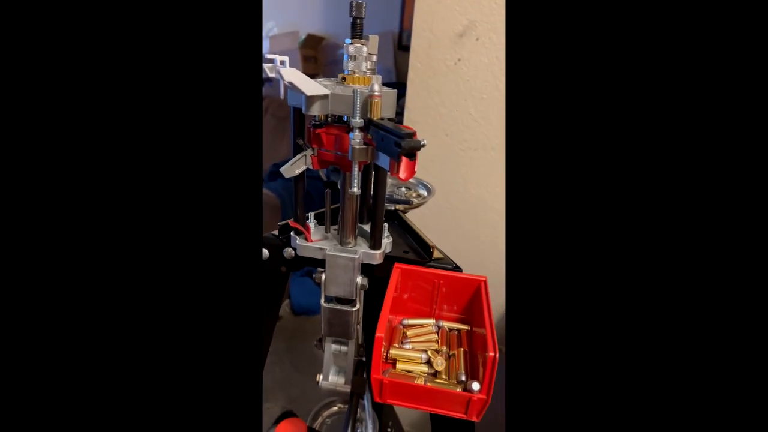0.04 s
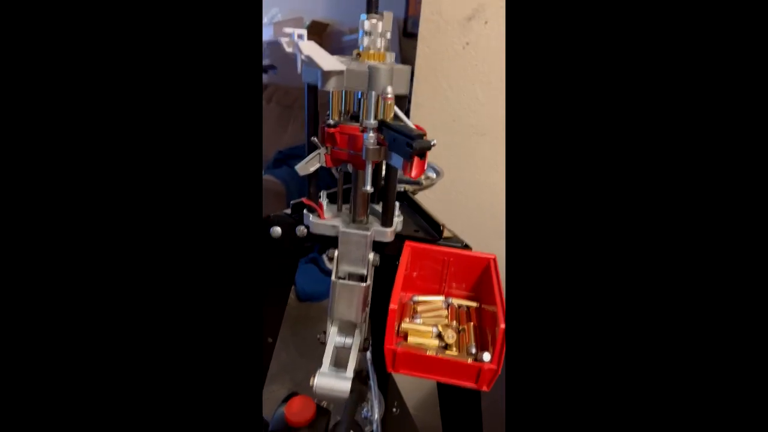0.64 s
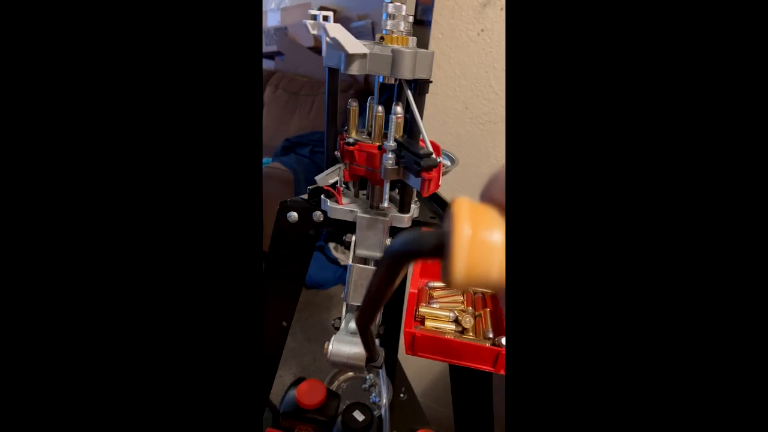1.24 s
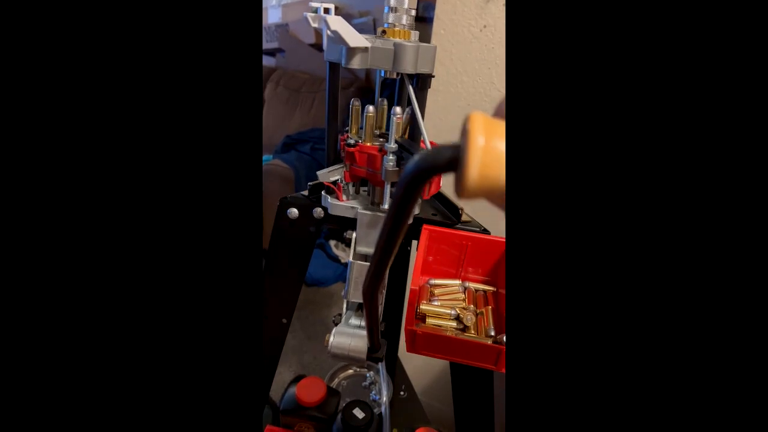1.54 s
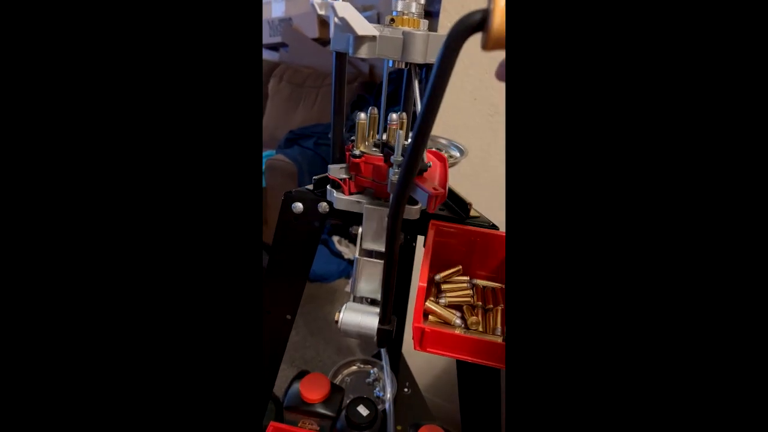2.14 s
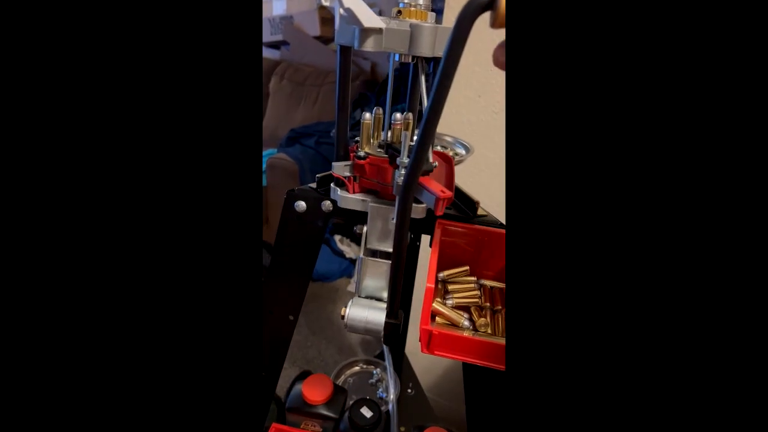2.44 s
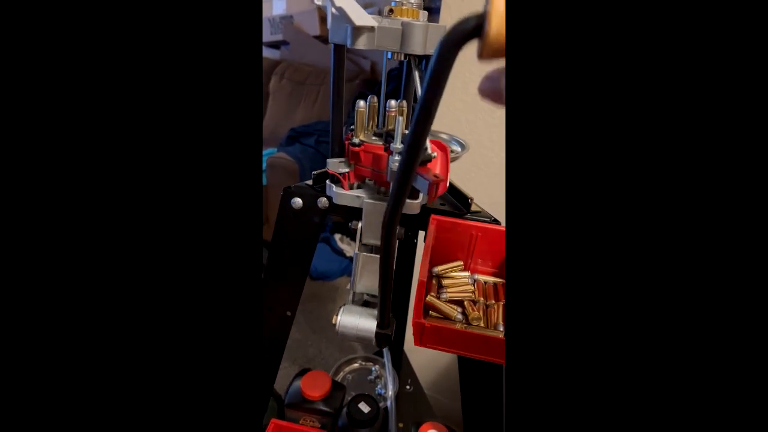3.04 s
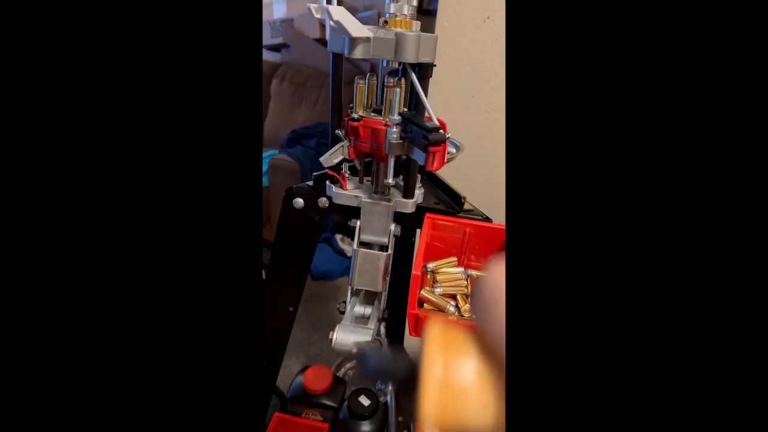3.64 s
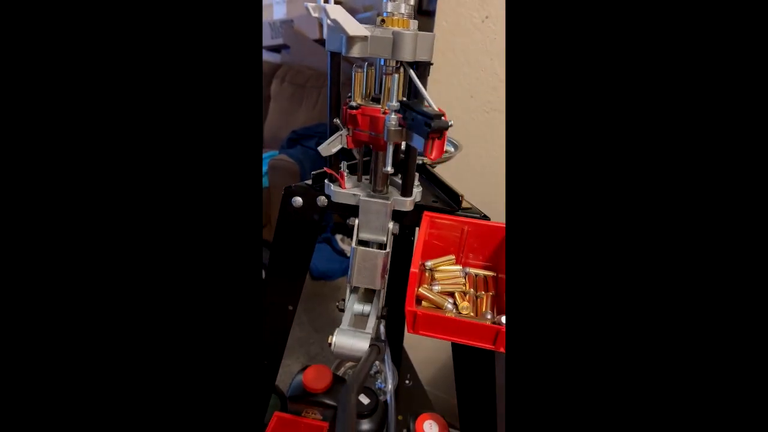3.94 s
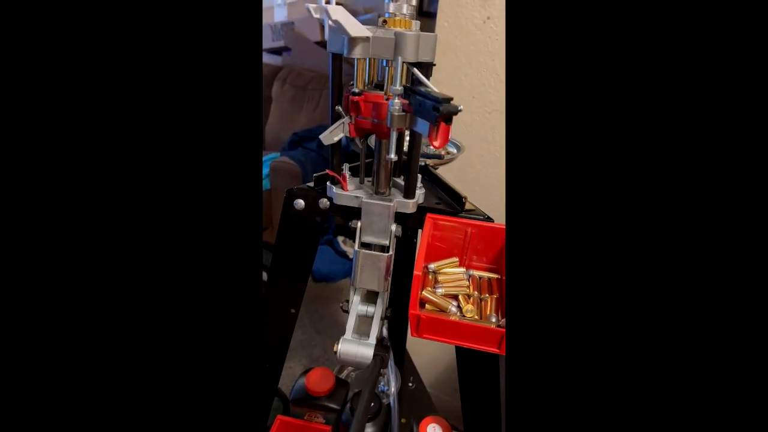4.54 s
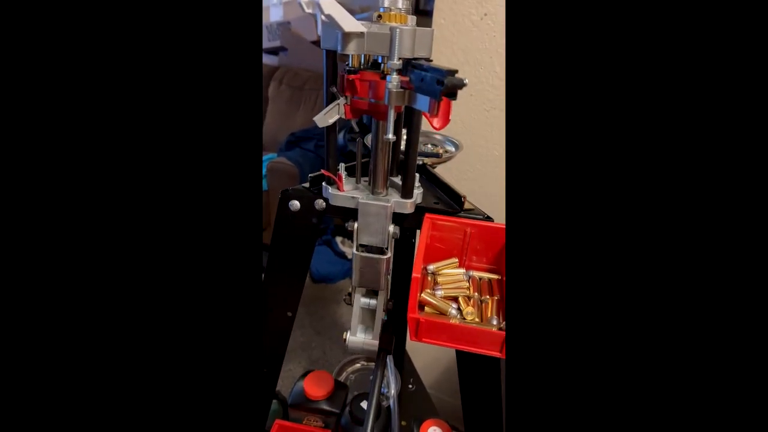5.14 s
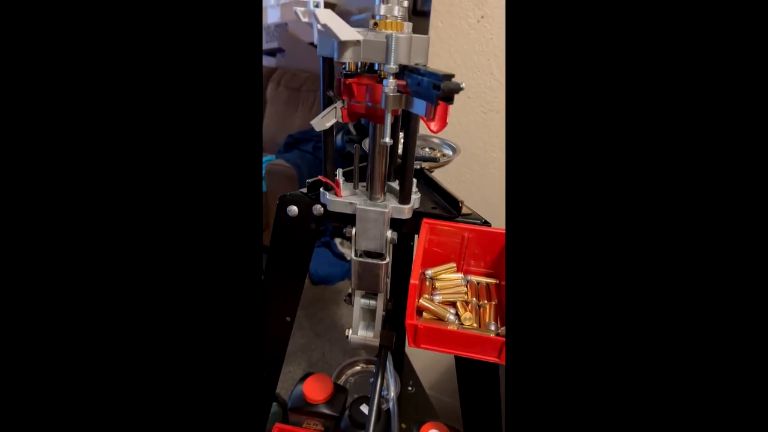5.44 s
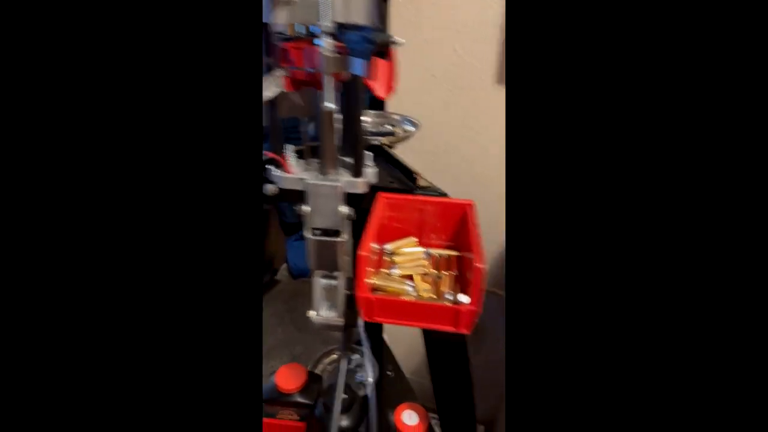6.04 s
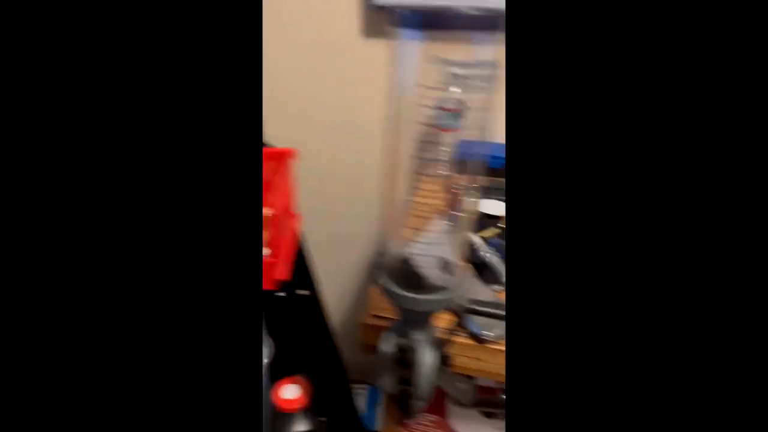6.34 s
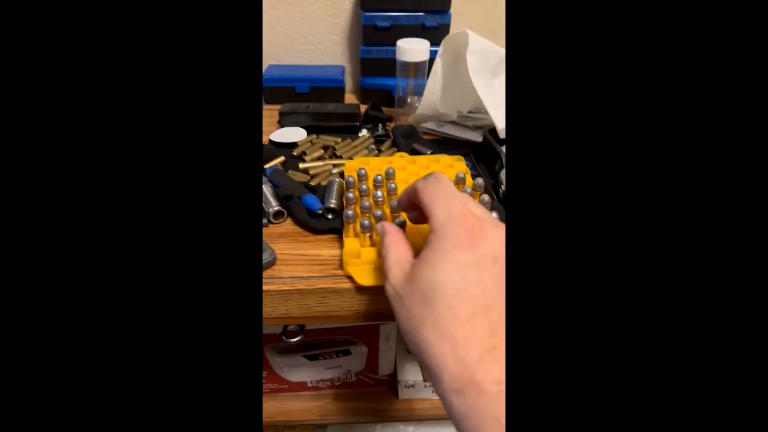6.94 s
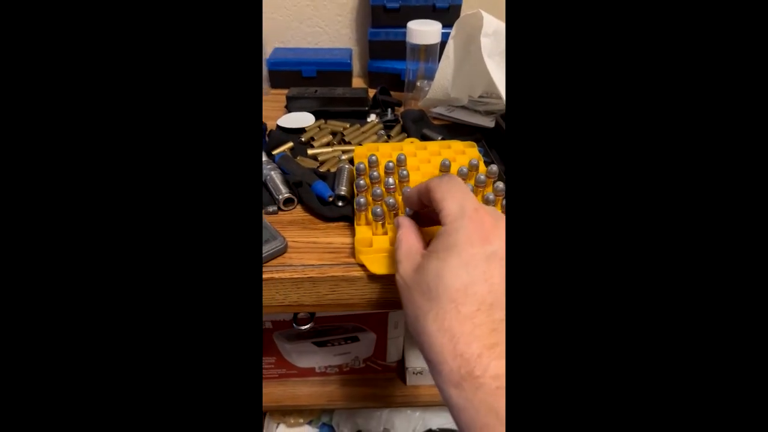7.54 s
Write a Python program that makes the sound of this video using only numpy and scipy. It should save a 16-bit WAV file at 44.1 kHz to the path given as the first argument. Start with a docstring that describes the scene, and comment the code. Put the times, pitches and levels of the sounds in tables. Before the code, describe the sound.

Quiet ventilation and handling rumble run throughout, heard close on a hand-held phone in a small room. At first a faint low hum sits under light ticks of brass cases, the soft slide of a reloading press ram, thin metal rings and a slight handle creak. Near 1.8 seconds the hum drops away, a sprung part snaps and the steel linkage clatters in the loudest burst, thudding through frame and bench and dying out by 2.4 seconds. At 2.9 seconds a latch catches, then a spring snags and rings lightly. Soft sliding and a few ticks lead to a second snap with a bench thump at 5 seconds. From 5.7 to 6.2 seconds come more metal knocks, thumps and loud handle creaks. A few light clacks close at about 7.7 seconds.

```python
"""One stroke of a lever reloading press at a bench in a small room, close to a hand-held phone.
Ventilation and handling rumble run throughout. A low hum opens; brass cases tick, the ram slides, thin
metal rings, the handle creaks faintly. Near 1.8 s the hum drops away, a sprung part snaps over and the
steel linkage and shell plate clatter, shaking frame and bench. At 2.9 s a latch catches, then a spring
snags. A second snap at 5 s; from 5.7 s more blows and loud handle creaks; last clacks at 7.7 s."""
import sys
import numpy as np
from scipy import signal
from scipy.fft import rfft, irfft, next_fast_len
from scipy.io import wavfile
from scipy.ndimage import uniform_filter1d

SR = 44100
rng = np.random.default_rng(int(sys.argv[2]) if len(sys.argv) > 2 else 0)


def master(y):
    """Save y as 16-bit WAV."""
    cut = np.clip(np.atleast_2d(y).T, -1, 1)
    pcm = np.round(cut * 32767)  # scale
    wavfile.write(sys.argv[1], SR, pcm.astype(np.int16))


N = 343098
T = np.arange(N) / SR

# background envelopes: (time [s], level [dB])
VENT_LEVEL = [(0, -52.5), (.6, -52), (1.8, -55), (2.3, -56), (2.75, -56.5), (3.2, -53.5), (4.5, -51.5),
              (6, -51.5), (7.78, -54)]
HANDLING_LEVEL = [(0, -76), (2.7, -70.5), (3.35, -49.5), (3.8, -59), (4.3, -55.5), (5.7, -50.5), (6.1, -61),
                  (7.78, -57)]
# fan lines: (frequency [Hz], level [dB])
FAN_LINES = [(75.4, -73), (236.9, -65), (355.3, -72)]
# low hum: (time [s], frequency [Hz], level [dB])
HUM_TRACK = [(0, 145.8, -58.5), (.6, 147.7, -57), (1.05, 147.4, -56), (1.13, 151.4, -49.5),
             (1.4, 152.2, -54.5), (1.64, 153, -51.5), (1.75, 153, -69)]
# sliding metal: (time [s], length [s], level [dB], edge [dB], crest [0-1], resonance [Hz], boost [dB])
METAL_SLIDES = [(0.141, 0.16, -61, -5, 0.06, 1000, 12), (0.42, 1.43, -63, 0, 0.23, 5030, 8.5),
                (1.858, 0.088, -31.5, 7, 0.23, 4180, 12), (2.96, 0.44, -61, 5, 0.32, 8600, 10),
                (3.087, 0.13, -65, -19, 0.1, 704, 8), (4.422, 0.75, -62.5, -13, 0.32, 2000, 6),
                (4.536, .19, -53, -11, 0.77, 2015, 8), (5.669, 0.14, -43, -22, 0.08, 2100, 4),
                (5.766, 0.21, -51, 0, .3, 2580, 12), (5.997, 0.08, -51.5, -18, 0.34, 1000, 2),
                (6.452, 0.089, -68, 2, 0.27, 2150, 5), (7.6, .17, -60.5, -1, .45, 1100, 6)]
# thin metal tones: (time [s], frequency [Hz], level [dB], rise [s], t60 [s], waver [ratio])
METAL_RINGS = [(.752, 2050, -51, 0.019, 0.13, 0.03), (1.435, 15000, -64, .025, .2, .002),
               (1.476, 15120, -29, 0.032, 0.09, .002), (1.871, 12840, -25, .0016, .19, .004),
               (1.873, 12500, -23.5, .0016, 0.22, .014), (2.078, 12400, -37.5, 0.0025, 0.038, 0.0068),
               (1.727, 1904, -29.5, 0.0022, 0.089, .06), (2.0544, 1989, -22.5, 0.0008, 0.014, .01),
               (2.078, 1790, -19.5, 0.0011, 0.016, .01), (2.085, 2010, -21.5, 0.00048, 0.012, .01),
               (3.98, 2190, -55, 0.0072, .06, .09), (5.8121, 950, -31.5, 0.0014, 0.046, 0.053),
               (6.015, 989, -39, 0.003, 0.1, 0.032), (6.462, 2180, -52.5, 0.0035, 0.19, 0.059),
               (7.708, 832, -41, .003, 0.041, 0.054)]
# impacts: (time [s], level [dB], body [dB], edge [dB], chatter t60 [s])
# body: gain below 1.1 kHz; edge: gain from 4.5 kHz up
BRASS_TICKS = [(.152, -34, 0, 0.5, 0.023), (.195, -26.5, 15, -6, 0.025), (.2225, -18.5, 2, 10, 0.11),
               (.314, -20.5, 8, -7, 0.033), (.886, -45, 2, 10, .03), (1.076, -19, -20, 8.5, 0.077),
               (1.185, -20.5, 4, -1, 0.078), (1.593, -44, 0, 17, .01), (1.607, -35.5, 7, 25.5, 0.011),
               (1.6845, -25, 2, 2, 0.017), (3.444, -26, 10, -4.5, 0.065), (4.446, -36.5, 0, 12, .025),
               (4.457, -21, 6, -6.5, 0.061), (4.483, -25, 3, -9, 0.038), (4.877, -37, -2, 8.5, .025),
               (4.978, -6, -2.5, -11, 0.13), (5.668, -9.5, 6, 0, .04), (5.676, -1.5, 0.5, -3, 0.081),
               (5.875, -26, 7, 7, 0.022), (7.585, -41.5, 0, 9, .02), (7.639, -30, 21.5, 1, 0.087),
               (7.661, -33.5, 16, 10, 0.081)]
STEEL_CLACKS = [(1.6953, 9, -7.5, -11, 0.015), (1.7268, 8.5, -17.5, 0.5, 0.16),
                (1.8695, 28.5, -6, -9, 0.011), (1.8745, 25.5, -1.5, 3.5, 0.025),
                (1.8865, 21.5, -1, -.5, .025), (1.8915, 21, -1, 0.5, 0.025), (1.9, 20, 4, -5, 0.011),
                (1.9055, 17, -1, -1.5, 0.011), (1.9205, 15, 1, 3, 0.049), (1.941, 14.5, -1, -5.5, 0.015),
                (1.9557, 21, 2.5, -6.5, 0.0067), (1.9572, 20, 4, 2, .006), (1.9692, 20, -2.5, -2.5, 0.018),
                (1.9835, 16.5, -3, -2.5, 0.03), (2.0015, 20.5, 0, -13.5, 0.0066),
                (2.0038, 18.5, -0.5, 0.5, 0.007), (2.0322, 16.5, -2.5, -5, .007),
                (2.0338, 25, -4.5, -2, 0.0036), (2.0478, 13, -7, 0, 0.0094),
                (2.0772, 10.5, -10.5, -1.5, 0.0091), (2.2, 7.5, 0.5, -2, 0.027),
                (2.261, -8.5, 8.5, -10.5, .05), (2.282, -15.5, 2, -3, .04), (2.361, -15, -3, -5, 0.044),
                (5.735, -8.5, 5, -12, 0.019), (5.812, 8.5, 0.5, 1.5, 0.015), (6.015, -5, -3, -7, .06),
                (7.696, -23, 8, -8, 0.052), (7.707, -11, 6.5, -4, 0.053)]
PART_SNAPS = [(1.7592, 13, -3, 0, .014), (4.989, -10, -2, 1, 0.038)]
LATCH_CATCHES = [(2.908, -22.5, 2, 4.5, .04), (2.919, -10, 3, -2.5, 0.13), (2.937, -11.5, 3.5, -1, 0.068)]
SPRING_SNAGS = [(3.052, -29, 3.1, 4, .04), (3.092, -27, 17.5, 3, 0.13), (3.12, -28, 23, 6.5, 0.17),
                (3.156, -34, 15, 14, 0.03), (3.166, -33.5, 17, 13, 0.022), (3.2255, -25, 0, 5, 0.02)]
# tone of every rebound: (body [dB], edge [dB], chatter t60 [s])
REBOUND_TONE = (0, -0.85, .012)
# fading runs of contacts: (time [s], level [dB], mean gap [s], fall [dB/s])
HANDLE_RUNS = [(1.225, -23, 0.04, 8), (5.7, -16, 0.005, 90)]
REBOUND_RUNS = [(1.881, 15, .0062, 94.5), (1.976, 9, .006, 219.5), (2.053, 1, .0078, 399.5),
                (5.688, -12, 0.01, 81)]
# single contacts: (time [s], level [dB])
HANDLE_SLIPS = [(5.6965, -7), (5.7105, -5), (5.7265, -8), (5.7685, 2), (5.7965, -7), (5.805, 4),
                (5.835, -7), (5.8405, -7), (5.8978, 1), (5.9205, -2), (6.0042, -5.5), (6.0475, -14),
                (6.090, -14), (6.1005, -14), (6.1305, -19), (6.169, -13)]
FRAME_THUDS = [(1.8695, 11), (1.876, 18), (1.887, 18), (1.956, 7.5), (5.677, 0)]
BENCH_THUMPS = [(1.871, 9), (4.992, 9.5), (5.678, 18), (5.688, 13.5), (5.708, 12)]
# modes of the parts: (frequency [Hz], gain [dB], t60 [s])
CASE_MODES = [(1998, 3, 0.12), (2140, -2, 0.03), (2660, -0.5, 0.055), (3240, -3, .08), (3893, 2.5, 0.072),
              (4210, 3, 0.13), (4750, 1.5, 0.025), (5220, 2, 0.062), (5954, 0, 0.051), (6687, -2.5, .045),
              (7660, 1, 0.046), (8200, -3, .08), (9000, 0, .08), (11670, 2.5, .045)]
FRAME_MODES = [(317.3, 2, 0.2), (501, -2, .18), (631, 3, .14), (700, 0, .17), (747.7, 0, .17),
               (890, 4.5, 0.17), (955, 3, .17), (990, 4, 0.14), (1092, -3, .18), (1152, 2.5, .22),
               (1308, 3, .22), (1664, -3.5, 0.22), (1745, -4, .17), (2130, 4, .2), (2381, 1.5, 0.17),
               (3944, 2, 0.21)]
LATCH_MODES = [(376, 5.5, 0.15), (1047, -6, 0.058), (2035, -4, 0.098), (2190, -1.5, .09), (2487, -9, .07),
               (3270, 0, 0.05), (3930, 10, .015), (6230, 1, .04)]
SPRING_MODES = [(980, -7, .07), (2170, -6, .08), (3900, -11, .06), (5700, -2, .04), (6540, -7, 0.25),
                (6625, -8, .3), (6710, -3, 0.38), (8470, -1, .22), (8560, 2, 0.28), (8700, 2, 0.26),
                (11400, -3, .06)]
# source spectra: (frequency [Hz], gain [dB])
VENT_SPECTRUM = [(20, -25), (45, -4.5), (72, 0), (130, -5), (190, -8), (250, -2), (350, -10), (450, -17),
                 (700, -21), (1100, -20.5), (1700, -22.5), (2200, -29), (2650, -37), (3500, -41),
                 (4200, -46.5), (5200, -49), (6400, -48.5), (10000, -58), (16000, -62)]
HANDLING_SPECTRUM = [(22, -21), (50, 1), (100, 0), (200, -24), (500, -45.5), (2000, -79.5)]
RUB_SPECTRUM = [(100, -21), (500, -4.5), (950, 5), (1400, -4), (2100, 1.5), (3000, -5.5), (4000, -4.5),
                (7000, -15), (10500, -29), (16000, -27.5)]
BRASS_SPECTRUM = [(150, -16), (900, -1.5), (2200, 2.5), (4500, -4), (7500, -6), (10000, -13.5),
                  (13000, -7.5), (16000, -15)]
CREAK_SPECTRUM = [(200, -15), (900, -7.5), (1600, -15), (2100, -2), (2500, -.5), (3400, -15), (4300, -22),
                  (6500, -23), (11000, -42), (16000, -47)]
STEEL_SPECTRUM = [(100, -34.5), (230, -22), (320, -13.5), (480, -14.5), (650, -5.5), (780, -1.5), (950, 1),
                  (1150, -1), (1400, -10.5), (1900, -1.5), (2600, -8), (3200, -7.5), (4000, -10.5),
                  (5200, -14), (6500, -13.5), (10000, -23), (12800, -18), (16000, -32.5)]
SNAP_SPECTRUM = [(200, -11), (600, -12), (1000, -7), (1400, -10.5), (2300, 3), (3200, -7.5), (4200, -3),
                 (5200, -7), (6700, -6), (7250, 0), (7700, 1), (8400, -12.5), (10000, -15.5), (13000, -11),
                 (16000, -20)]
THUD_SPECTRUM = [(60, -24.5), (150, -7.5), (230, -6.5), (330, 0), (480, -1.5), (700, -14), (2000, -50)]
BENCH_SPECTRUM = [(20, -19), (55, -1.5), (130, -4), (260, -14.5), (450, -10), (900, -41), (3000, -67.5)]
# press radiation: (frequency [Hz], left minus right [dB])
PRESS_BALANCE = [(200, -1), (380, 0), (650, -8.5), (1300, -5), (2100, -2), (3500, -0.5), (6000, -0.5)]
# room decay: (frequency [Hz], t60 [s])
ROOM_DECAY = [(150, 0.3), (600, .27), (1100, 0.356), (3000, 0.28), (7000, 0.35), (12500, .22),
              (16000, 0.061)]


def undb(db):
    return 10 ** (np.asarray(db) / 20)


def curve(rows, column=1):
    """Table column, linear in time."""
    rows = np.array(rows)
    return np.interp(T, rows[:, 0], rows[:, column])


def at_hz(points, hz):
    """Table value, linear in log frequency."""
    knots_hz, values = np.transpose(points)
    return np.interp(np.log(np.maximum(hz, 1)), np.log(knots_hz), values)


def fade(t, t60_s):
    return np.exp(-np.log(1000) * t / max(t60_s, .001))


def unit_rms(x):
    return x / np.sqrt(np.mean(x ** 2))


def add(out, time_s, sound):
    start = int(time_s * SR)
    out[:, start:start + sound.shape[-1]] += sound[..., :N - start]


def colour(x, *spectra):
    """Minimum-phase filter; the spectra add in dB."""
    size = 2 * next_fast_len(x.shape[-1] // 2 + 2048)
    hz = np.arange(size // 2 + 1) * SR / size
    gain_db = sum(at_hz(spectrum, hz) for spectrum in spectra)
    cepstrum = irfft(np.log(undb(gain_db)))
    cepstrum[1:size // 2] *= 2
    cepstrum[size // 2 + 1:] = 0
    return irfft(rfft(x, size) * np.exp(rfft(cepstrum)))[..., :x.shape[-1]]


def ripple(depth_db, count):
    """Random peaks and dips above 400 Hz."""
    gain_db = np.append(0, depth_db * rng.standard_normal(count))
    return np.column_stack([np.linspace(400, SR / 2, count + 1), gain_db])


def wander(size, window):
    """Smoothed noise, unit RMS."""
    return unit_rms(uniform_filter1d(rng.standard_normal(size), size=window))


def grains(size, rough, spread):
    """Uneven micro-impacts, nearly alike in both channels."""
    noise = rng.standard_normal((4, size))
    return unit_rms((noise[0] + spread * noise[1:3]) * np.exp(rough * noise[3]))


def contact(t60_s, snap, rise_s=.0006, size=6144):
    """Impulse plus dying chatter; each contact point favours other modes."""
    t = T[:size]
    force = grains(size, rough=.4, spread=.36) * fade(t, t60_s) * np.minimum(t / rise_s, 1)
    force /= np.sqrt(np.sum(force ** 2) / 2)
    force[:, int(rise_s * SR)] += snap
    force = colour(force, ripple(depth_db=4, count=130))
    band_power = uniform_filter1d(np.mean(np.abs(rfft(force)) ** 2, axis=0), size=130)
    flatten = np.column_stack([np.fft.rfftfreq(size, 1 / SR), -10 * np.log10(band_power)])
    return colour(force, flatten[1:])


def blows(rows, spectrum, snap, top_db, harden):
    """Impacts: strike point tilts the spectrum; harder blows are brighter."""
    out = np.zeros((2, N))
    for time_s, db, body_db, edge_db, t60_s in rows:
        treble_db = edge_db + top_db + harden * db
        tilt = [(1100, body_db), (1700, 0), (2700, 0),
                (4500, edge_db), (7500, edge_db), (11000, treble_db)]
        add(out, time_s, undb(db) * colour(contact(t60_s, snap), spectrum, tilt))
    return out


def detuned_contacts(rows, spectrum, t60_s, snap, scatter=.07):
    """Like contacts, each randomly shifted in pitch."""
    out = np.zeros((2, N))
    for (time_s, db), chance in zip(rows, rng.uniform(-1, 1, len(rows))):
        shifted = [(hz * (1 + scatter * chance), gain_db) for hz, gain_db in spectrum]
        add(out, time_s, undb(db) * colour(contact(t60_s, snap), shifted))
    return out


def runs(rows, jitter, scatter_db, count):
    """Expand runs to uneven, weakening contacts: (time [s], level [dB])."""
    contacts = []
    index = np.arange(count)
    for start_s, db, gap_s, fall_db_per_s in rows:
        timing, strength = rng.uniform(-1, 1, (count, 2)).T
        delay_s = gap_s * (index + jitter * timing * (index > 0))
        contacts += zip(start_s + delay_s, db - fall_db_per_s * delay_s + scatter_db * strength)
    return contacts


def resonate(drive, modes, gain_db):
    """Ring of a shaken part's damped modes."""
    t = T[:SR // 2]
    ring = sum(undb(db) * np.cos(2 * np.pi * hz * t) * fade(t, t60_s) for hz, db, t60_s in modes)
    return undb(gain_db) * signal.fftconvolve(drive, ring[None], axes=1)[:, :N]


def ventilation():
    """Air noise, near mono in the bass, plus fan lines."""
    mid, side = rng.standard_normal((2, N))
    side = colour(side, [(110, -20.5), (280, -15), (600, 4), (1500, -4), (8000, -.5)])
    air = colour(np.array([mid + side, mid - side]), VENT_SPECTRUM, ripple(depth_db=2.5, count=400))
    fan = sum(undb(db) * np.sqrt(2) * np.sin(2 * np.pi * hz * T) for hz, db in FAN_LINES)
    return unit_rms(air) * undb(curve(VENT_LEVEL)) + fan


def hum():
    """Drifting tone near 150 Hz; faint from 1.75 s."""
    phase = 2 * np.pi * np.cumsum(curve(HUM_TRACK)) / SR
    return undb(curve(HUM_TRACK, column=2)) * np.sqrt(2) * np.sin(phase)


def handling():
    """Rumble of the hand on the phone."""
    return unit_rms(colour(rng.standard_normal(N), HANDLING_SPECTRUM)) * undb(curve(HANDLING_LEVEL))


def metal_slides(grip_db=1.7, width_ratio=1.1):
    """Ram, rods and cases rub: dense slips swell and ebb through one resonance."""
    out = np.zeros((2, N))
    for time_s, length_s, db, edge_db, crest, hz, boost_db in METAL_SLIDES:
        size = int(length_s * SR)
        progress = np.interp(np.linspace(0, 1, size), [0, crest, 1], [0, .5, 1])
        swell = np.sin(np.pi * progress) ** .8
        resonance = [(hz / width_ratio, 0), (hz, boost_db), (hz * width_ratio, 0)]
        tilt = [(2500, 0), (5500, edge_db)]
        slips = colour(grains(size, rough=.9, spread=.56), RUB_SPECTRUM, resonance, tilt)
        grip = undb(grip_db * wander(size, window=300))
        add(out, time_s, undb(db) * unit_rms(slips * grip) * swell)
    return out


def brass_cases():
    """Light contacts ring the hollow cases."""
    ticks = blows(BRASS_TICKS, BRASS_SPECTRUM, snap=.094, top_db=-6, harden=.025)
    return ticks + resonate(ticks, CASE_MODES, gain_db=-49)


def metal_rings():
    """Single tones of thin metal; rubbed ones waver in pitch."""
    out, t = np.zeros((2, N)), T[:SR // 2]
    for time_s, hz, db, rise_s, t60_s, waver in METAL_RINGS:
        pitch_hz = hz * (1 + waver * wander(len(t), window=120))
        envelope = np.minimum(t / rise_s, 1) ** 2 * fade(np.maximum(t - rise_s, 0), t60_s)
        add(out, time_s, undb(db) * envelope * np.sin(2 * np.pi * np.cumsum(pitch_hz) / SR))
    return out


def handle_creak():
    """Stick-slip: soft fading runs plus loud single slips."""
    soft_slips = runs(HANDLE_RUNS, jitter=.3, scatter_db=5, count=9)
    soft = detuned_contacts(soft_slips, CREAK_SPECTRUM, t60_s=.029, snap=.12)
    return soft + detuned_contacts(HANDLE_SLIPS, CREAK_SPECTRUM, t60_s=.011, snap=.85)


def steel_linkage():
    """Steel strikes, loose parts rebound; frame and cases ring along."""
    rattle = runs(REBOUND_RUNS, jitter=.4, scatter_db=5.5, count=12)
    rebounds = [(time_s, db, *REBOUND_TONE) for time_s, db in rattle]
    clatter = blows(STEEL_CLACKS + rebounds, STEEL_SPECTRUM, snap=.4, top_db=-13, harden=.48)
    frame_ring = resonate(clatter, FRAME_MODES, gain_db=-64)
    return clatter + frame_ring + resonate(clatter, CASE_MODES, gain_db=-63)


def sprung_part():
    """A small sprung part snaps over."""
    return blows(PART_SNAPS, SNAP_SPECTRUM, snap=.3, top_db=-1, harden=.03)


def frame_thuds():
    """The heavy frame thuds under the hardest blows."""
    return detuned_contacts(FRAME_THUDS, THUD_SPECTRUM, t60_s=.03, snap=1.1)


def bench_thumps():
    """The bench takes the load; mono."""
    return detuned_contacts(BENCH_THUMPS, BENCH_SPECTRUM, t60_s=.22, snap=.29).mean(axis=0)


def latch():
    """The latch catches and rings as the handle starts back."""
    clicks = blows(LATCH_CATCHES, BRASS_SPECTRUM, snap=.077, top_db=-.5, harden=.027)
    return clicks + resonate(clicks, LATCH_MODES, gain_db=-37)


def spring():
    """The stretching spring snags and rings."""
    snags = blows(SPRING_SNAGS, BRASS_SPECTRUM, snap=.08, top_db=-1, harden=.032)
    return snags + resonate(snags, SPRING_MODES, gain_db=-40)


def room(direct, gain_db, rise_s):
    """Diffuse echoes, decaying per octave; the top dies first."""
    t = T[:SR * 2 // 3]
    hz = np.fft.rfftfreq(len(t), 1 / SR)
    noise = rfft(rng.standard_normal((2, len(t))))
    centres_hz = np.geomspace(125, 16000, 8)
    tail = 0
    for centre_hz, weights in zip(centres_hz, np.eye(len(centres_hz))):
        band = irfft(noise * at_hz(list(zip(centres_hz, weights)), hz), len(t))
        tail += band * fade(t, at_hz(ROOM_DECAY, centre_hz))
    tail *= np.minimum(t / rise_s, 1) ** 2
    tail /= np.sqrt(np.sum(tail ** 2) / 2)
    return undb(gain_db) * signal.fftconvolve(direct, tail, axes=1)[:, :N]


def scene():
    """Press to the right, room echoes, background."""
    parts = steel_linkage() + brass_cases() + latch() + spring() + sprung_part() + frame_thuds()
    press = undb(-1.5) * (parts + metal_slides()) + metal_rings() + handle_creak() + bench_thumps()
    direct = np.array([colour(press[0], [(hz, db / 2) for hz, db in PRESS_BALANCE]),
                       colour(press[1], [(hz, -db / 2) for hz, db in PRESS_BALANCE])])
    echoes = room(direct, gain_db=-13, rise_s=.0054)
    left, right = direct + echoes + ventilation() + hum() + handling()
    return np.array([np.append(0, left[:-1]), right])  # left lags one sample


def record(dry):
    """Peaks are rounded softly below full scale; then the phone's low-pass."""
    ceiling, cutoff_hz = .84, 16200
    lowpass = signal.ellip(8, .2, 70, cutoff_hz, fs=SR, output="sos")
    return signal.sosfilt(lowpass, ceiling * np.tanh(dry / ceiling))


dry = scene()
out = record(dry)
master(out)
```